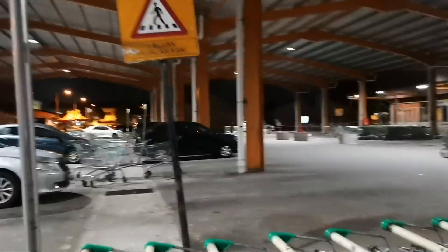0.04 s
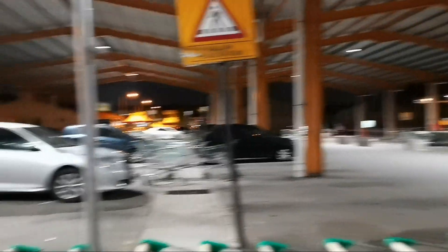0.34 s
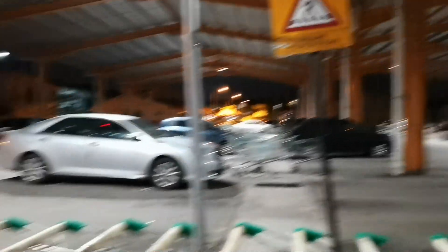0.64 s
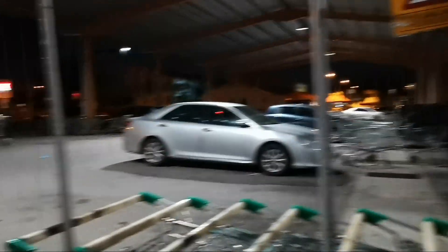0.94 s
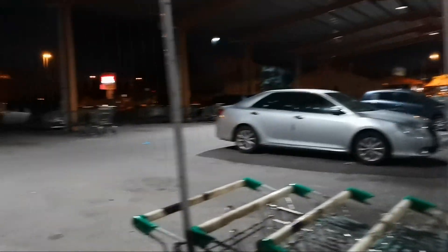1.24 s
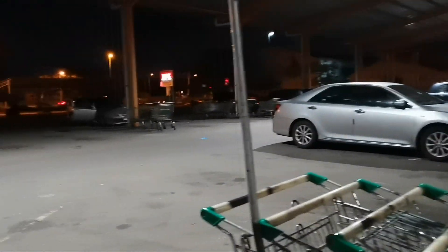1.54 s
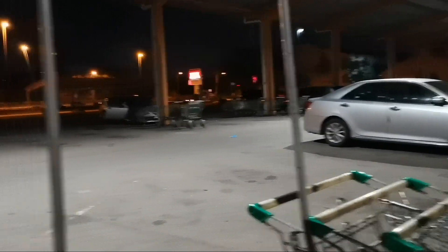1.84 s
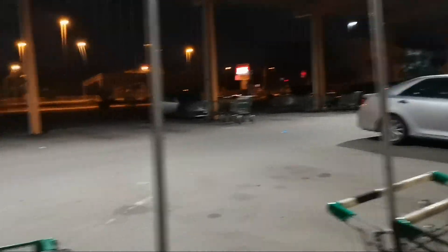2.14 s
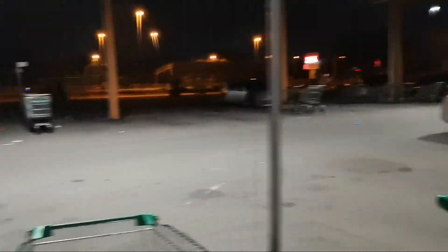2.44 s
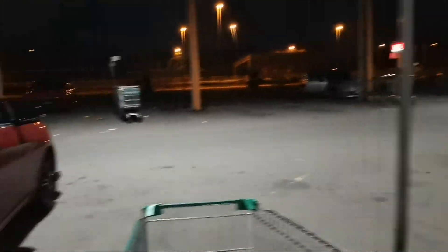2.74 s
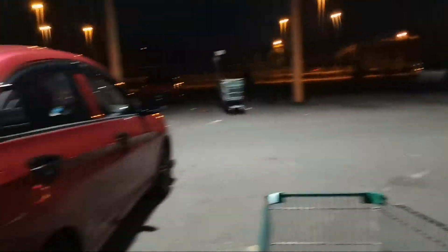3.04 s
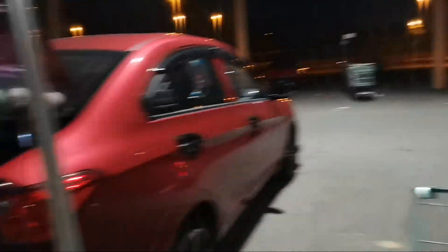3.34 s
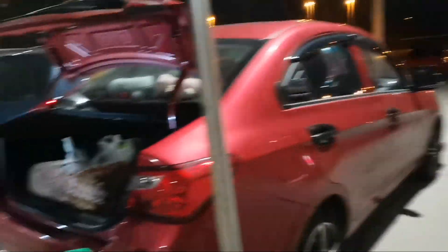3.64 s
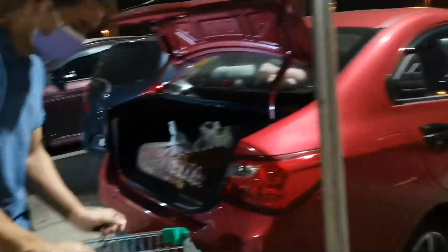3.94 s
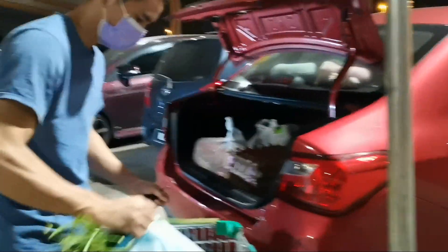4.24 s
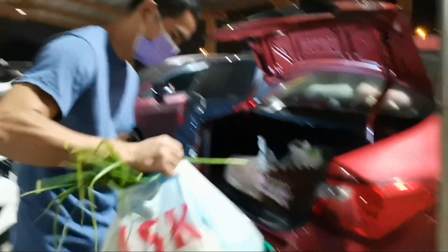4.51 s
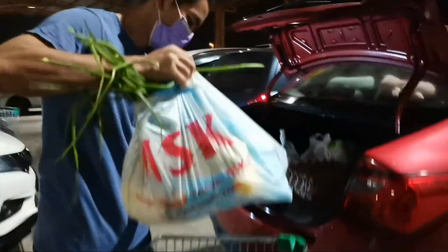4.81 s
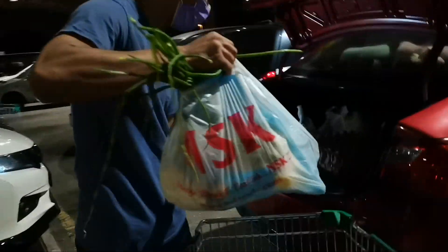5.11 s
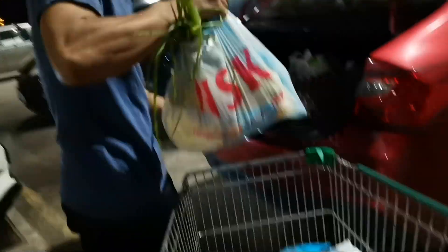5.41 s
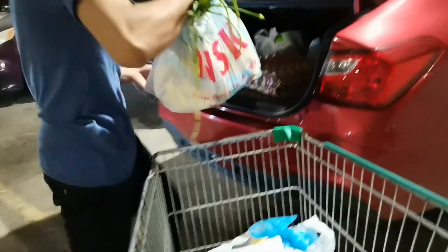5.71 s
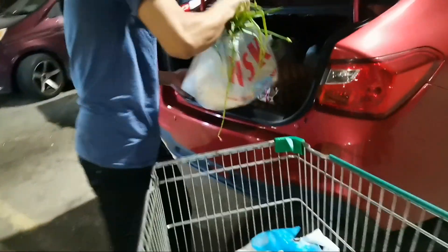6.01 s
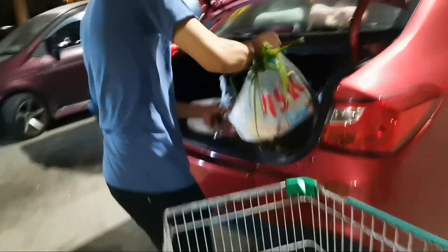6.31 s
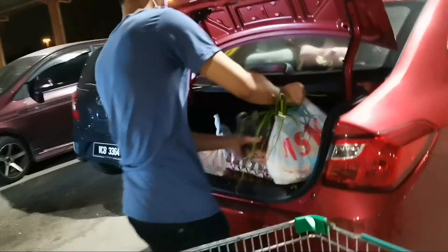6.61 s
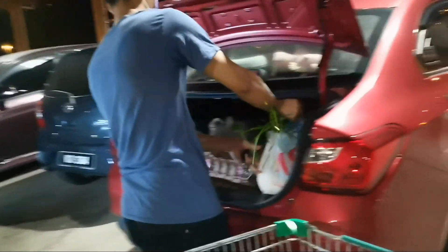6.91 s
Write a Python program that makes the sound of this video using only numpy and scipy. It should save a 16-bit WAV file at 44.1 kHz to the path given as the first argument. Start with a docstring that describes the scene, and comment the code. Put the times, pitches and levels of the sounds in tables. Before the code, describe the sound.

Surges of bright metallic rattling come from shopping trolleys rolling on concrete, slightly blurred by a car park roof. After a short lull the baskets shake again, joined by the close rustle of a plastic bag, and the last loud surge brings sharp clanks and a high wheel squeal. Behind it, traffic rumbles, machines drone and a far engine slowly rises in pitch. Wind or handling bumps the microphone now and then.

```python
"""Surges of metallic rattle and a castor squeal: wire shopping trolleys in a roofed, open-sided car park.
Rough concrete shakes the baskets: thousands of contacts ring the wires, frames knock and scrape,
wheels crunch and thud. Nearby a plastic grocery bag crinkles as it is lifted and set down.
The clatter blurs under the steel roof. Behind it a distant engine climbs, machines hum, traffic rumbles.
A faint far-off groan opens the scene; wind or handling buffets the microphone now and then."""
import sys
import numpy as np
from scipy import signal
from scipy.fft import rfft, irfft, next_fast_len
from scipy.io import wavfile
from scipy.ndimage import uniform_filter1d

SR = 44100
rng = np.random.default_rng(int(sys.argv[2]) if len(sys.argv) > 2 else 0)


def int16_out(signal):
    """Quantize to a 16-bit WAV file."""
    q = np.round(np.clip(np.atleast_2d(signal).T, -1, 1) * 32767)
    wavfile.write(sys.argv[1], SR, q.astype(np.int16))


N = 306759
T = np.arange(N) / SR
FREQS = np.fft.rfftfreq(N, 1 / SR)
LEFT_RIGHT = np.array([[1], [-1]])

# Surges of shaking. Each row: start in seconds, time until the fade in seconds, wire drive in dB,
# then offsets from it in dB for frame clatter, wheel crunch and highest ringing.
SURGES = [(-0.08, 0.18, -31, -12, -15, -3), (0.405, 0.3, -32.5, -15.5, -35, -1.5),
          (0.687, 0.17, -34.5, -8, -27, 1), (0.85, 0.42, -27.5, -13, -35, 1),
          (1.265, 0.15, -25.5, -7, -26, 2), (1.382, 0.16, -24, -9, -22, 2), (1.536, 0.23, -21, -13, -19, 4),
          (1.76, 0.14, -19, -6.5, -18, 5.5), (1.914, 0.17, -22.5, -9, -15, 2),
          (2.64, 0.095, -33, -9, -24, 10.5), (2.858, 0.15, -34, -12, -13, 9.5),
          (3.03, 0.28, -40, -6, -5.5, 4), (3.372, 0.36, -32.7, -11, -10.5, 3.5),
          (3.79, 0.48, -33.5, -8.5, -12, 4), (4.147, 0.068, -28.5, -10, -7, 7),
          (4.232, 0.23, -25.5, -15, -14, 6), (4.484, 0.28, -28.5, -8, -11.5, 4.5),
          (4.763, 0.17, -32, -9, -12, 1), (5.038, 0.095, -37, -5, -11, 2),
          (5.542, 0.19, -27, -3.5, -7.5, 0), (5.8, 0.25, -26, -6, -7.5, 3.5),
          (6.009, 0.21, -21.5, -7, -11.5, 3), (6.226, 0.15, -19.5, -7, -8.5, 4.5),
          (6.377, 0.14, -24, -8.5, -9, 2), (6.547, 0.053, -37.5, 5, -14, -16.5),
          (6.818, 0.08, -38.5, -29.5, -32, 5)]
FRAME_COLUMN, CRUNCH_COLUMN, TOP_COLUMN = 3, 4, 5
# Path from the trolleys to the listener.
# Each row: time in seconds, direct over diffuse chatter in dB, left minus right in dB.
TROLLEY_PATH = [(0, -3, 0.67), (2.2, -14, 1.5), (2.8, -26, 2.04), (3.4, -10.5, 0.8), (6.96, -13, 1.3)]
# Wire rattle as heard, including the microphone's peaks and notch.
# Each row: frequency in Hz, relative level in dB.
HEARD_RATTLE_SPECTRUM = [(1500, -47), (2600, -6.5), (3400, -9), (4170, -2.5), (4700, -5), (5600, -6),
                         (6600, -0.5), (7350, 2), (7850, 0.5), (8400, -6), (9150, -10.5), (9900, -1),
                         (11200, -6), (13200, -10.5), (15500, -17.5)]
# Tube frame spectrum. Each row: frequency in Hz, relative level in dB.
FRAME_SPECTRUM = [(600, -21.5), (1100, -12), (1550, -6.5), (2100, 1), (2450, 3.5), (2800, -0.5), (3300, -6),
                  (6000, -20)]
# Long wires that ring clearly. Each row: pitch in Hz, relative level in dB.
LONG_WIRES = [(4096, -2), (5443, -8), (6042, -4), (6275, -5.5), (7370, -0.5), (7444, 0.5), (7758, 2.5),
              (8749, -14), (9829, -1), (10254, -2), (11100, 0), (12037, -15)]
# Frames knocking together. Each row: start in seconds, level in dB, centre pitch in Hz.
FRAME_KNOCKS = [(.728, -35, 2420), (0.917, -41, 2410), (1.071, -44, 1410), (1.107, -31, 2420),
                (1.315, -27, 2205), (1.43, -35, 1280), (1.733, -23, 4210), (1.74, -26, 1510),
                (1.875, -29, 4000), (1.985, -25, 2600), (2.035, -27, 2195), (2.082, -29, 1604),
                (2.594, -44, 2400), (3.09, -35, 7550), (3.096, -36, 1095), (3.5, -37, 2400),
                (4.582, -33, 1510), (5.111, -36, 2414), (6.28, -20, 1502), (6.325, -16.5, 7470)]
# A faint low far-off groan, then frames rubbing.
# Each row: start in seconds, length in seconds, pitch in Hz, level in dB, pitch scatter as a fraction.
GROANS_AND_SCRAPES = [(0.21, 0.13, 323, -44.5, .11), (0.333, 0.18, 300, -45, 0.15),
                      (2.8, 0.25, 860, -43, 0.182), (3.2, .3, 430, -51.5, .12),
                      (4.098, 0.19, 430, -44.5, .12), (4.2, .5, 1427, -39.5, .06),
                      (4.527, 0.17, 6150, -29, 0.12), (5.651, 0.17, 455, -39, 0.109),
                      (5.668, 0.12, 831, -45, .2), (6.008, 0.12, 444, -41, 0.14),
                      (6.07, .12, 2225, -35, .11), (6.567, .15, 2260, -30.5, 0.091)]
# Spectrum of wheels on grit. Each row: frequency in Hz, relative level in dB.
GRIT_SPECTRUM = [(300, -34), (600, -14), (800, 0), (1100, 1.5), (1400, 2), (1800, 3.5), (2600, -13),
                 (5000, -42)]
# Wheels dropping into joints. Each row: start in seconds, level in dB, pitch in Hz, length in seconds.
JOINT_BUMPS = [(0.0, -22, 108, 0.029), (.37, -35, 57.4, 0.13), (1.235, -30, 98.3, 0.092),
               (1.78, -25.5, 90, 0.13), (1.825, -31, 220, 0.066), (1.973, -30.5, 90, 0.15),
               (2.07, -34, 176.4, 0.127), (5.175, -33.5, 230, 0.067), (5.315, -29, 202.3, 0.034),
               (5.501, -37, 270, .06), (5.675, -34, 91.1, 0.23), (6.769, -39, 221.2, 0.083)]
# Castor squeals. Each row: start in seconds, length in seconds, pitch in Hz, relative level in dB.
CASTOR_SQUEALS = [(4.266, 0.071, 1975, -33), (4.358, .11, 1930, -39), (5.555, 0.17, 2010, -36),
                  (5.555, 0.11, 6740, -31), (5.981, 0.14, 2006, -31.5), (6.39, 0.09, 6640, -17.5),
                  (6.421, 0.075, 6520, -19.5), (6.47, 0.098, 6630, -21.5), (6.559, 0.22, 6680, -38),
                  (6.41, 0.06, 7700, -27), (6.844, 0.048, 7720, -39), (6.83, .09, 6650, -43)]
# Handling of the bag. Each row: start in seconds, time until the fade in seconds, level in dB.
BAG_MOVES = [(4.15, .1, -30), (4.22, 0.22, -37.5), (4.52, 0.22, -41), (5.525, 0.23, -35.5),
             (6.0, 0.12, -28), (6.245, 0.08, -27)]
# Bag crinkle as heard, including the microphone's peaks and notch.
# Each row: frequency in Hz, relative level in dB.
HEARD_CRINKLE_SPECTRUM = [(400, -36), (1200, 6.5), (2500, 7.5), (5000, -16), (7500, 12), (9000, -26),
                          (10500, 10), (15500, -18)]
# Distant engine. Each row: time in seconds, firing rate in Hz, level in dB.
ENGINE_CLIMB = [(0, 138, -42.5), (3.4, 143.6, -41.5), (3.6, 146.5, -38), (3.85, 149.5, -39),
                (4.0, 153, -33), (4.3, 155.5, -38), (4.85, 160, -36), (5.05, 162.1, -39.5),
                (5.33, 165.8, -32), (5.55, 171, -37), (5.75, 171.8, -35.5), (5.9, 172.5, -29.5),
                (6.08, 173.7, -30.5), (6.17, 173.5, -38.5), (6.3, 173.2, -29), (6.55, 173.8, -32),
                (6.7, 173, -38.5), (6.96, 174, -42.5)]
# Idling machines. Each row: pitch in Hz, level in dB.
HUM_TONES = [(61, -53), (90, -44.5), (224, -48.5)]
# Traffic spectrum. Each row: frequency in Hz, relative level in dB.
TRAFFIC_SPECTRUM = [(20, 1.5), (40, -5), (62, 1), (90, 0.5), (125, -1.3), (180, 1.4), (235, -3.5),
                    (310, -11), (450, -16), (630, -23), (1100, -18), (2400, -24.5), (7000, -23.5),
                    (15000, -47)]
# Low buffets of wind or handling on the microphone.
# Each row: centre in seconds, half-width in seconds, relative level in dB.
MIC_BUFFETS = [(0.5, 0.44, -3), (1.417, 0.14, 0), (1.87, .12, 2), (2.8, 0.28, -9), (5.85, .2, -15),
               (6.349, 0.2, 1)]
# Imbalance of the two microphone ports. Each row: frequency in Hz, left minus right in dB.
PORT_BALANCE = [(25, 19), (80, 8.5), (170, 6.5), (340, 2), (700, 1), (1200, -0.5), (2200, -5), (3300, -0.5),
                (4300, -0.5), (5500, -1), (7000, -3.5), (8400, 4), (9900, 4.5), (12000, 2.5), (15000, 2.5)]


def trolleys():
    """Rough concrete shakes the baskets; wires chatter densely, the heavier frames clatter lower."""
    wire_surges = surge([row[:3] for row in SURGES], fade_db_per_s=60)
    wire_gain = np.hypot(wire_surges, undb(-42.5)) * undb(0.6 * walk(15))  # never quite at rest
    top_gain = shaking(TOP_COLUMN, resting_db=-40.5, fade_db_per_s=78, uneven_db=1.1)  # dies first
    frame_gain = shaking(FRAME_COLUMN, resting_db=-45, fade_db_per_s=55.5, uneven_db=0.7)
    wires = basket_wires()
    # the highest ringing carries only when a basket faces the listener
    top = filtered(wires, 1 - lowpass(hz=11300, order=10))
    wires = (wires - top) * wire_gain + top * top_gain
    clatter = rattle(rate_per_s=2300, spread_db=3, t60_s=0.13)
    frames = steel(clatter, FRAME_SPECTRUM, width_hz=21, depth_db=3.5) * frame_gain
    pan = undb(LEFT_RIGHT * curve(TROLLEY_PATH, column=2) / 2)
    return (wires * undb(2.0) + frames * undb(2.5)) * jolts() * pan


def basket_wires():
    """Dense contacts ring the welded wires, heard both directly and diffusely."""
    chatter = contacts(rate_per_s=7000, spread_db=3.2)
    direct = np.stack([np.roll(chatter, -22), chatter])  # from one side: left leads by 0.5 ms
    diffuse = rattle(rate_per_s=5100, spread_db=1.0, t60_s=0.27)
    strikes = diffuse + undb(curve(TROLLEY_PATH, column=1)) * unit(direct)
    ringing = steel(strikes, HEARD_RATTLE_SPECTRUM, width_hz=30, depth_db=2.5)
    return unit(ringing + undb(-10.5) * wire_pings())


def wire_pings(strikes_per_s=30, t60_s=0.079):
    """Long wires are struck at random; each rings at its own pitch."""
    pings = 0
    for hz, db in LONG_WIRES:
        strikes = (rng.random(N) < strikes_per_s / SR) * rng.uniform(-1.1, 1, (2, N))
        pole = np.exp((2j * np.pi * hz - np.log(1000) / t60_s) / SR)
        pings = pings + undb(db) * unit(signal.lfilter([1], [1, -pole], strikes).imag)
    return unit(pings)


def shaking(column, resting_db, fade_db_per_s, uneven_db):
    """Gain of one trolley part: surges over a resting level, wavering on uneven ground."""
    rows = [(row[0], row[1], row[2] + row[column]) for row in SURGES]
    return np.hypot(surge(rows, fade_db_per_s), undb(resting_db)) * undb(uneven_db * walk(12))


def jolts(rate_per_s=19, decay_s=0.011):
    """Gain of the rattle: jumps at each small jolt, then settles."""
    kicks = (rng.random(N) < rate_per_s / SR) * rng.exponential(size=N)
    settling = signal.lfilter([1], [1, -np.exp(-1 / (decay_s * SR))], kicks)
    return unit(np.sqrt(1 + 0.22 * settling))


def steel(x, spectrum, width_hz, depth_db, pieces=3):
    """Pieces of welded steel take turns to ring, each with its own resonances."""
    shares = np.array([undb(12 * walk(7)) for _ in range(pieces)])
    shares /= shares.sum(axis=0)
    colour = undb(response_db(spectrum))
    return unit(sum(share * filtered(x, colour * steel_modes(width_hz, depth_db)) for share in shares))


def steel_modes(width_hz, depth_db):
    """Overlapping random resonances, as a gain per frequency."""
    grid_hz = np.arange(0, SR / 2, width_hz)
    ripple = rng.standard_normal(SR // 2)[:len(grid_hz)]
    return undb(depth_db * np.interp(FREQS, grid_hz, ripple))


def frame_knocks(modes=14, t60_s=0.14):
    """Frame strikes frame: a cluster of tube modes rings briefly and spreads through the trolley."""
    knocks, t = np.zeros((2, N + SR)), T[:SR // 4]
    for start_s, db, hz in FRAME_KNOCKS:
        modes_hz = hz * 2 ** rng.uniform(-0.5, 0.55, (modes, 1))
        phases = 2 * np.pi * rng.random((2, modes, 1))
        clank = unit(np.sin(2 * np.pi * modes_hz * t + phases).sum(axis=1))
        at = int(start_s * SR)
        knocks[:, at:at + len(t)] += undb(db) * clank * np.exp(-np.log(1000) * t / t60_s)
    knocks = knocks[:, :N]
    return knocks + undb(-16) * ring(knocks, t60_s=0.22)


def groans_and_scrapes():
    """Rough, barely pitched tones: a faint low far-off groan, then frames rubbing."""
    groans = sum(undb(db) * burst(start_s, length_s, hz, wander=scatter, wander_per_s=hz / 3)
                 for start_s, length_s, hz, db, scatter in GROANS_AND_SCRAPES)
    low = filtered(groans, lowpass(hz=650, order=6))  # long waves reach both ports alike
    return low + ring(groans - low, t60_s=0.11)


def wheel_crunch():
    """Hard wheels crunch over grit and ring their steel mounts."""
    crunch = rattle(rate_per_s=2600, spread_db=2.0, t60_s=0.038)
    gain = shaking(CRUNCH_COLUMN, resting_db=-62, fade_db_per_s=44, uneven_db=1.3)
    return steel(crunch, GRIT_SPECTRUM, width_hz=27, depth_db=5.5) * gain


def wheel_bumps():
    """Wheels drop into joints of the concrete with dull thuds."""
    return sum(undb(db) * burst(start_s, length_s, hz, wander=0.12, wander_per_s=70)
               for start_s, db, hz, length_s in JOINT_BUMPS)


def castor(fork_hz=6540, fork_width_hz=73):
    """A dry castor sticks and slips, squealing unsteadily; its steel fork rings on."""
    squeal = sum(undb(db) * burst(start_s, length_s, hz, wander=0.014, wander_per_s=660)
                 for start_s, length_s, hz, db in CASTOR_SQUEALS)
    fork = filtered(squeal, 1 / np.hypot(1, 2 * (FREQS - fork_hz) / fork_width_hz))
    return ring(squeal, t60_s=0.014) + undb(1) * ring(fork, t60_s=0.74)


def bag():
    """Creases of thin plastic snap in dense little clusters."""
    snaps = rattle(rate_per_s=1100, spread_db=0.5, t60_s=0.0016)
    clusters = undb(1.6 * walk(25))
    crinkle = unit(filtered(snaps * clusters, undb(response_db(HEARD_CRINKLE_SPECTRUM))))
    return crinkle * surge(BAG_MOVES, fade_db_per_s=27)


def engine():
    """A far exhaust note with a weak octave, throbbing unevenly."""
    phase = wandering_phase(curve(ENGINE_CLIMB, column=1), wander=0.0015, wander_per_s=7.3)
    note = np.sin(phase) + undb(-17.5) * np.sin(2 * phase)
    throb = undb(0.8 * walk(35))
    return unit(note * throb) * undb(curve(ENGINE_CLIMB, column=2))


def machine_hum():
    """Idling machines drone, wavering in pitch and level."""
    hum = 0
    for hz, db in HUM_TONES:
        tone = np.sin(wandering_phase(hz, wander=0.01565, wander_per_s=12))
        hum = hum + undb(db) * unit(tone * undb(2 * walk(7.6)))
    return hum


def traffic_and_buffets(growth_db_per_s=0.4645):
    """Traffic wash, with low buffets of wind or handling on the microphone over it."""
    coherence = 0.81 * lowpass(hz=720, order=6)  # long waves reach both ports alike
    colour = undb(response_db(TRAFFIC_SPECTRUM))
    mid = filtered(rng.standard_normal(N), colour * np.sqrt(1 + coherence))
    side = filtered(rng.standard_normal(N), colour * np.sqrt(1 - coherence))
    wash = unit(mid + LEFT_RIGHT * side)
    deep = filtered(wash, lowpass(hz=65, order=4))
    buffets = sum(undb(db) * np.exp(-((T - centre_s) / half_s) ** 2)
                  for centre_s, half_s, db in MIC_BUFFETS)
    deep_gain = undb(-9.5) + buffets
    gain_db = -32.5 + growth_db_per_s * T + 0.26 * walk(6.2)
    return (wash + deep * (deep_gain - 1)) * undb(gain_db)


def contacts(rate_per_s, spread_db):
    """Tiny random impacts of unequal size."""
    hits = rng.random(N) < rate_per_s / SR
    return hits * rng.standard_normal(N) * undb(spread_db * rng.standard_normal(N))


def rattle(rate_per_s, spread_db, t60_s):
    """Dense contacts, each a decaying noise that reaches the two ports by its own paths."""
    decay = np.exp(-2 * np.log(1000) * T[:SR // 4] / t60_s)
    energy = np.abs(signal.fftconvolve(contacts(rate_per_s, spread_db) ** 2, decay)[:N])
    return unit(np.sqrt(energy) * rng.standard_normal((2, N)))


def surge(rows, fade_db_per_s, rise_s=0.08):
    """Gain of overlapping surges: each rises, holds and fades."""
    power = 0
    for start_s, length_s, db in rows:
        age_s = T - start_s
        rise = np.clip(age_s / rise_s, 0, 1)
        fade_db = fade_db_per_s * np.maximum(age_s - length_s, 0)
        power = power + (rise * undb(db - fade_db)) ** 2
    return np.sqrt(power)


def burst(start_s, length_s, hz, wander, wander_per_s):
    """A tone that swells and dies while its pitch wanders."""
    swell = np.sin(np.pi * np.clip((T - start_s) / length_s, 0, 1))
    return np.sqrt(2) * swell * np.sin(wandering_phase(hz, wander, wander_per_s))


def wandering_phase(hz, wander, wander_per_s):
    """Phase of a tone whose pitch strays by the rms fraction `wander`."""
    return 2 * np.pi * np.cumsum(hz * (1 + wander * walk(wander_per_s))) / SR


def ring(x, t60_s, delay_s=0.):
    """Dense decaying reflections, different at each port."""
    t = T[:SR * 2]
    tail = rng.standard_normal((2, len(t))) * np.exp(-np.log(1000) * t / t60_s) * (t >= delay_s)
    tail /= np.sqrt(np.sum(tail ** 2, axis=1, keepdims=True))
    return signal.fftconvolve(np.atleast_2d(x), tail, axes=1)[:, :N]


def walk(rate_per_s):
    """Random values joined by ramps, rms 1."""
    hold = max(int(SR / rate_per_s), 1)
    steps = np.repeat(rng.standard_normal(N // hold + 1), hold)
    return unit(uniform_filter1d(steps, hold))[:N]


def curve(table, column):
    """One table column, interpolated in time."""
    rows = np.array(table, float)
    return np.interp(T, rows[:, 0], rows[:, column])


def response_db(points):
    """(Hz, dB) points joined on a log-frequency axis."""
    hz, db = np.transpose(points)
    return np.interp(np.log(FREQS + 1), np.log(hz), db)


def lowpass(hz, order):
    """Low-pass gain per frequency, one half at `hz`."""
    return 1 / (1 + (FREQS / hz) ** order)


def filtered(x, gain):
    """Apply a gain per frequency."""
    size = next_fast_len(N)
    gain = np.interp(np.fft.rfftfreq(size, 1 / SR), FREQS, gain)
    return irfft(rfft(x, size) * gain, size)[..., :N]


def undb(db):
    """Decibels to gain."""
    return 10 ** (np.asarray(db) / 20)


def unit(x):
    """Scale to rms 1."""
    return x / np.sqrt(np.mean(x ** 2))


def scene():
    """Trolleys, groans and bag echo under the roof, over engine, machines, traffic and buffets."""
    sources = trolleys() + frame_knocks() + wheel_crunch() + groans_and_scrapes() + castor() + bag()
    roof_echo = undb(-22.5) * ring(sources, t60_s=0.9, delay_s=0.024)
    return sources + roof_echo + wheel_bumps() + engine() + machine_hum() + traffic_and_buffets()


def record(dry, cutoff_hz=15200):
    """Each microphone port has its own colour; the top is cut steeply."""
    port_gains = undb(LEFT_RIGHT * response_db(PORT_BALANCE) / 2)
    port_gains /= np.sqrt(np.mean(port_gains ** 2, axis=0))
    heard = np.stack([filtered(x, gain) for x, gain in zip(dry, port_gains)])
    return signal.sosfilt(signal.ellip(10, .2, 80, cutoff_hz, fs=SR, output="sos"), heard)


dry = scene()
out = record(dry)
int16_out(out)
```